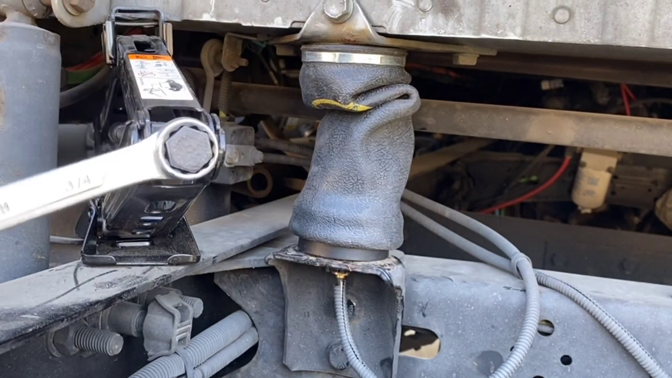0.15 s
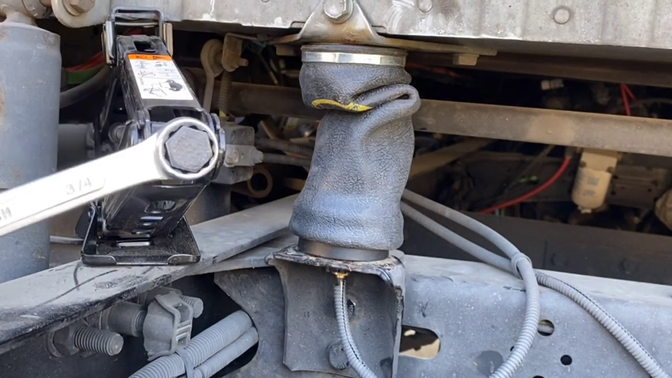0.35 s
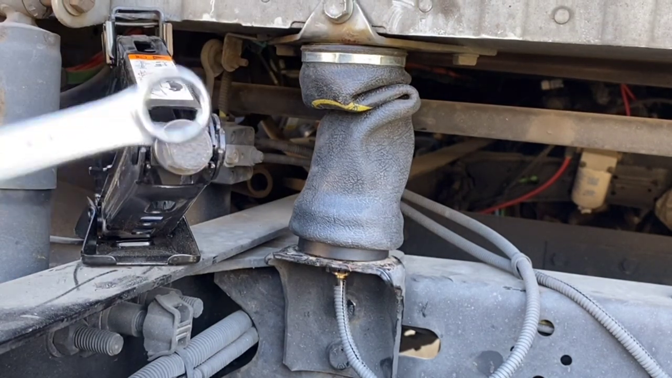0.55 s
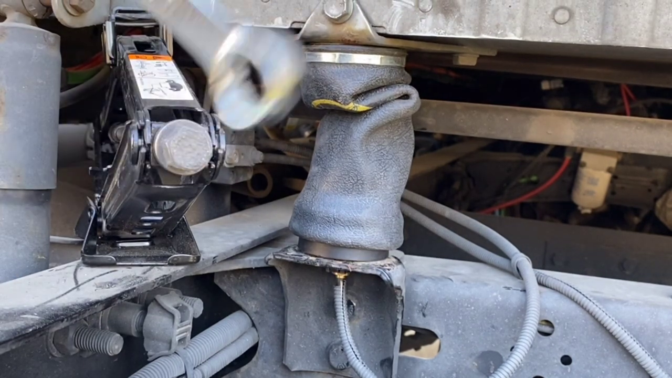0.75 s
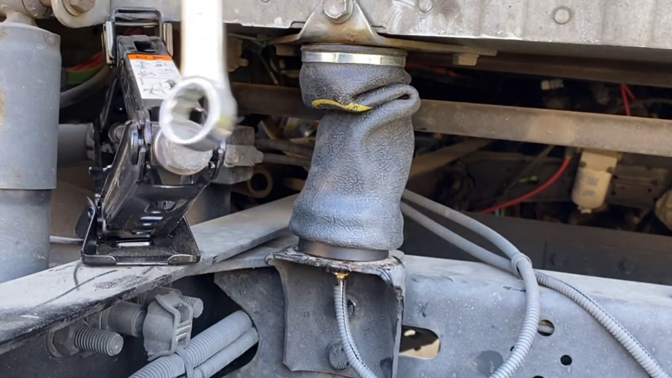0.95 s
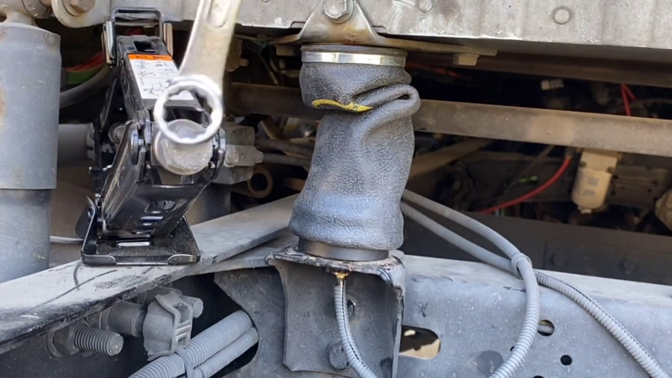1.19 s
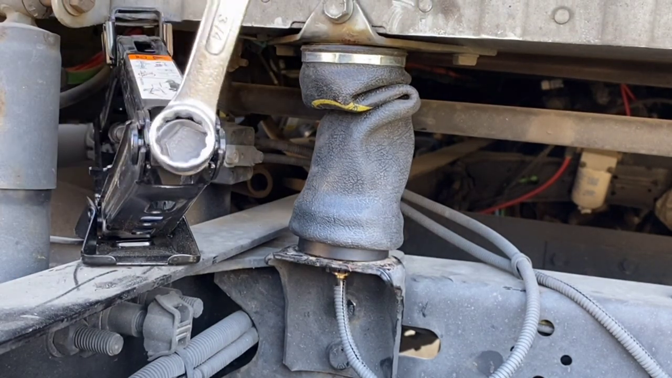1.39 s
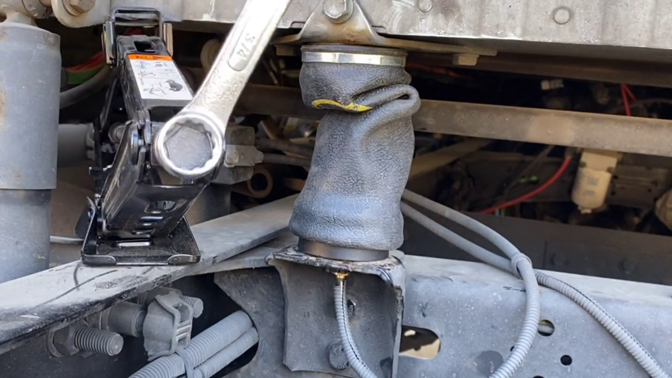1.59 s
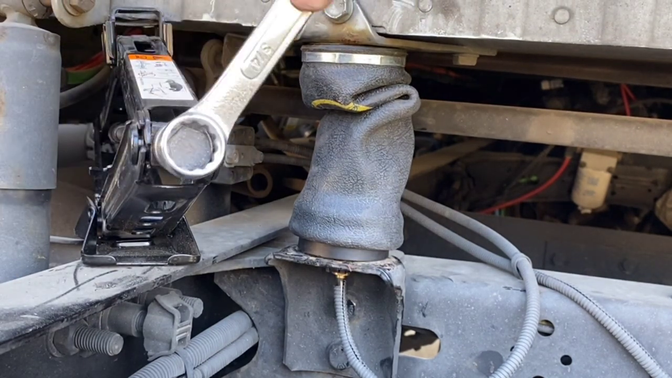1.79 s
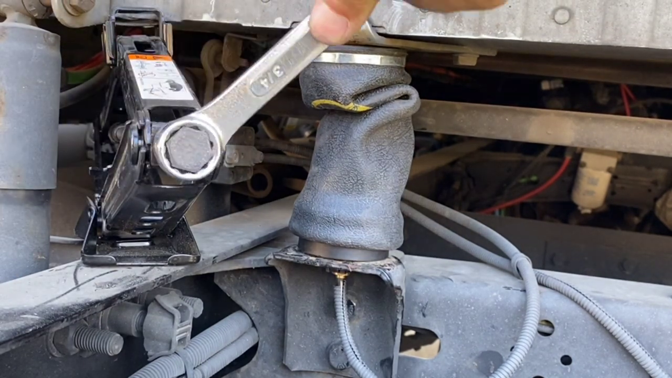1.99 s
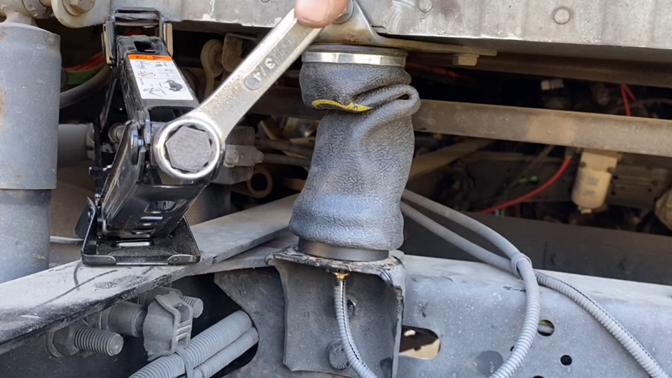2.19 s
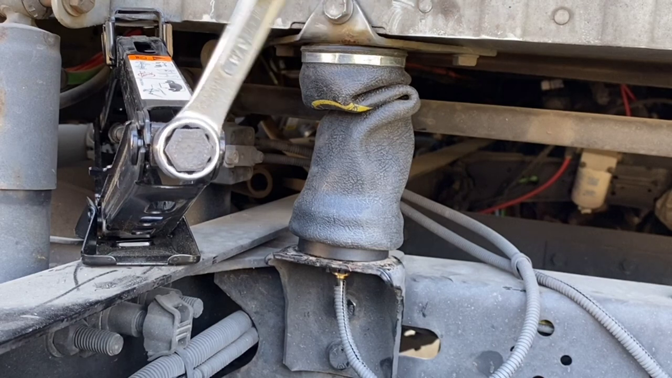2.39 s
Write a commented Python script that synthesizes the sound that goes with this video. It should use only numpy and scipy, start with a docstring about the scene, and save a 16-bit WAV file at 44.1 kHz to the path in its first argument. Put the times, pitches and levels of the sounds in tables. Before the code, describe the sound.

Steel wrench clanks on a jack's nut, pulled off and knocked back on, over low engine rumble

```python
"""A ring wrench works the screw of a scissor jack that stands on a truck's frame, outdoors.
The wrench is pulled off the nut, scrapes clear, is set on again and knocks home. Each contact is a short
chatter of tiny steel impacts that rings wrench, jack and frame: decaying noise plus decaying cosines.
Grainy noise makes faint rubs, and the frame hums on one low note after the heavy knocks.
Some way off an engine rumbles steadily, as throbbing noise over a weak hum; behind it lies a faint hiss."""
import sys
import numpy as np
from scipy import signal
from scipy.fft import rfft, irfft, next_fast_len
from scipy.io import wavfile
from scipy.ndimage import uniform_filter1d

SR = 44100
rng = np.random.default_rng(int(sys.argv[2]) if len(sys.argv) > 2 else 0)


def store_pcm(level_fs):
    """Save levels as 16-bit WAV."""
    pcm = np.round(np.clip(level_fs, -1, 1) * 32767).astype(np.int16)
    wavfile.write(sys.argv[1], SR, np.atleast_2d(pcm).T)


N = 108045
T = np.arange(N) / SR
SIZE = next_fast_len(N + SR)  # room for one second of ringing after the end
HZ = np.maximum(np.arange(SIZE // 2 + 1) * SR / SIZE, 1)


def from_db(db):
    """Turn decibels into a gain."""
    return 10 ** (np.asarray(db) / 20)


def rms_one(x):
    """Scale a sound to an average (rms) strength of 1."""
    return x / np.sqrt(np.mean(x ** 2) + 1e-20)


def hump(x, width):
    """Bell curve of height 1; width is its standard deviation."""
    return np.exp(-.5 * (x / width) ** 2)


def at_hz(points, hz):
    """Read every column of a table at a pitch, on a log-frequency axis."""
    table_hz, *columns = np.transpose(points)
    return [np.interp(np.log(hz), np.log(table_hz), column) for column in columns]


def causal_response(db):
    """Filter with these gains that acts as promptly as possible, never early (minimum phase)."""
    cepstrum = irfft(np.log(from_db(db)))
    half = len(cepstrum) // 2
    cepstrum[1:half] *= 2
    cepstrum[half + 1:] = 0
    return np.exp(rfft(cepstrum))


def stereo_noise(likeness):
    """White noise in two channels: likeness 1 is the same in both, 0 is unrelated."""
    mid, side = rng.standard_normal((2, N))
    c = np.clip(likeness, -1, 1)
    return (np.sqrt(1 + c) * mid + np.sqrt(1 - c) * side * [[1], [-1]]) / np.sqrt(2)


def coloured(x, spectrum):
    """Filter a sound by a table of pitches in Hz and gains in dB."""
    gain = from_db(at_hz(spectrum, HZ)[0])
    return irfft(rfft(x, SIZE) * gain, SIZE)[:, :N]


def decay(t60_s):
    """Exponential fade of unit energy that drops 60 dB in t60_s."""
    fall = np.exp(-np.log(1000) * T[:SR] / max(t60_s, 1e-3))
    return fall / np.linalg.norm(fall)


# the pitches at which the strength of each contact is given: [pitch_hz, ...]
STRENGTH_HZ = (420, 900, 2300, 4500, 11000)
# wrench meets nut; build-up and dying away are the times to change by a factor e
# [peak_s, build_up_s, dying_away_s, five relative strengths_db (one at each of STRENGTH_HZ),
#  favoured_resonance_hz, resonance_lift_db]
WRENCH_CONTACTS = [ (0.058, .010, 0.016, -3.5, -10.5, -5.5, -14, -4.5, 3180, 2.3),
                   (0.088, .001, 0.00067, -14, -7, 3, 4.5, 12, 2360, 3.2),
                   (0.2219, 0.00097, 0.0054, 22.5, 15, 22.5, 28.5, 13.5, 3040, 2.3),
                   (0.224, .0005, 0.00083, 27.5, 31.5, 26, 32, 23.5, 2450, 11),
                   (0.407, 0.0014, 0.011, 14.5, 13, 2.5, -4, -5, 7740, 5.1),
                   (.457, .010, .02, 24.5, 32, 27.5, 21.5, 19.5, 962, 8.6),
                   (.477, .012, .015, 29, 29, 27.5, 22.5, 20.5, 1503, 7.5),
                   (1.2307, .0005, 0.011, -2, 8, 16.5, 23, 23, 815, 18.3),
                   (1.290, .001, .008, -3, 3.5, 15, 19.5, 14, 820, 15.6),
                   (1.347, .002, 0.0038, 11, 3.5, 0.5, -7, -8, 3300, 3.7),
                   (1.47, .001, 0.011, 15, 16, 7.5, -7, -0.5, 700, 2.6),
                   (1.524, 0.0015, .012, 13, 16, 10.5, -1, 3, 950, 2),
                   (1.549, .008, 0.0057, 16, 23.5, 8.5, 7, 1.5, 950, 2),
                   (1.5657, 0.0011, 0.0016, 26, 25.5, 19.5, 14.5, 7, 930, 3.5),
                   (1.882, 0.0064, 0.0092, 24.5, 21, 19, 12.5, 4, 770, 8),
                   (1.944, 0.006, 0.011, 31.5, 35, 28, 20, 23, 560, 5),
                   (1.992, .008, 0.014, 26, 10, 16, 4.5, -13.5, 830, 3),
                   (2.083, .0004, 0.0024, 8, 14, 2, -1.5, 15, 1100, 5),
                   (2.114, 0.0011, 0.0032, 24.5, 20, 22, 32.5, 33, 8020, 6.8),
                   (2.124, 0.0049, 0.0026, 24.5, 26.5, 26.5, 29, 23.5, 4350, 5.8)]
CHATTER_PER_S, CHATTER_SPREAD_DB = 2000, 4  # average rate and size spread of the tiny impacts
PEAK_BLOW = 3.23  # weight of the impact at the peak; a typical tiny one weighs 1
SPOT_RIPPLE_DB, ACCENT_WIDTH_OCT = 3.5, 0.17


def contacts(size=8192):
    """Forces on the steel: the swelling and dying chatter of each contact, and the blow at its peak."""
    lead = size // 4  # samples kept free before each peak
    force = np.zeros((2, N + 2 * size))
    t = (np.arange(size) - lead) / SR
    hz = np.maximum(np.arange(size // 2 + 1) * SR / size, 1)
    for peak_s, rise_s, fall_s, *strength_db, accent_hz, accent_db in WRENCH_CONTACTS:
        happens = rng.random(size) < CHATTER_PER_S / SR
        sizes = from_db(CHATTER_SPREAD_DB * rng.standard_normal(size))
        impacts = happens * sizes * rng.choice([-1, 1], size)
        impacts[lead] = PEAK_BLOW
        time_constant = np.maximum(np.where(t < 0, rise_s, fall_s), 1e-4)
        chatter = rfft(impacts * np.exp(-np.abs(t) / time_constant))

        # level out the chatter's own broad colour, so that the table sets it
        own_db = 10 * np.log10(uniform_filter1d(np.abs(chatter) ** 2, size=45) + 1e-9)
        colour_db = np.interp(np.log(hz), np.log(STRENGTH_HZ), strength_db)
        colour_db += accent_db * hump(np.log2(hz / accent_hz), ACCENT_WIDTH_OCT)

        # every spot of contact lifts some narrow resonances and misses others, less so in the bass
        ripple = rms_one(uniform_filter1d(rng.standard_normal(len(hz)), size=35))
        ripple_db = SPOT_RIPPLE_DB * ripple * np.minimum(hz / 3000, 1)

        start = int(peak_s * SR)
        chatter_force = irfft(chatter * causal_response(colour_db + ripple_db - own_db))
        force[0, start:start + size] += chatter_force
        force[1, start + lead:start + lead + size] += irfft(causal_response(colour_db))
    return force[:, lead:lead + N]


# dense ring of the chassis; t60 is the time to fade by 60 dB
# [pitch_hz, early_t60_s, late_t60_s, late_part_db (relative to the early part), left_right_likeness (0 to 1)]
CHASSIS_RING = [(200, 0.1, .7, -2, 0.69), (500, 0.069, 0.56, -3, 0.18), (1000, 0.025, .33, -3.5, 0.22),
                (2000, .04, 0.22, 0, 0.55), (4080, 0.032, 0.15, -8.5, 1), (8000, 0.031, 0.19, -10, 1),
                (15000, .018, .12, -13.5, 0.84)]
CHASSIS_DB = 2.5


def chassis(count=18):
    """Countless close modes, as bands of fading noise: a quick clack and a longer ring."""
    out = 0
    edges = np.geomspace(120, 18000, count + 1)  # band edges in Hz
    for low, high in zip(edges, edges[1:]):
        early_s, late_s, late_db, likeness = at_hz(CHASSIS_RING, np.sqrt(low * high))
        fade = np.hypot(decay(early_s), from_db(late_db) * decay(late_s))
        ring = stereo_noise(likeness)[:, :SR] * fade
        band_pass = signal.butter(2, [low, high], "band", fs=SR, output="sos")
        band = signal.sosfilt(band_pass, ring)
        out = out + rms_one(band) * np.sqrt(2 * (high - low)) / SR
    return from_db(CHASSIS_DB) * out


# distinct notes of the jack: [pitch_hz, relative_height_db, t60_s]
JACK_NOTES = [(307.5, 10, .4), (417, 6.5, 0.41), (515.3, 4.5, 0.16), (554, 6.5, 0.29), (578.6, -7.5, 0.26),
              (744, 8, 0.42), (839.6, 7.5, .33), (972.3, 5, .3), (991.3, 10, 0.37), (1393, 1.5, .24),
              (1492, 12, .22), (1635, 14, 0.24), (1826, 9.5, 0.11)]
# distinct notes of the wrench, before the hand's damping: [pitch_hz, relative_height_db, undamped_t60_s]
WRENCH_NOTES = [(2260, 9.5, 0.2), (2746, 5.5, 0.2), (2773, 4.2, 0.4), (2973, 12, .16), (3527, 7, 0.17),
                (4383, 5.4, 0.12), (4930, 13, .17), (5155, 7, .1), (6228, 5.4, .35), (7540, 14, 0.039),
                (10830, 12, .05), (11430, 3.3, 0.14), (14700, 8.6, .04)]
MODES_DB = 1  # gain on all the notes
JACK_LONGEST_S, WRENCH_LONGEST_S = .6, .19  # upper limits on t60; the hand damps the wrench


def clear_modes():
    """Fading cosines: the distinct modes of jack and wrench after one impact."""
    out, t = np.zeros(SR), T[:SR]
    for modes, longest_s in ((JACK_NOTES, JACK_LONGEST_S), (WRENCH_NOTES, WRENCH_LONGEST_S)):
        for hz, db, t60_s in modes:
            rate = np.log(1000) / min(t60_s, longest_s)
            note = np.exp(-rate * t) * np.cos(2 * np.pi * hz * t)
            out += from_db(db) * 2 * rate / SR * note
    return from_db(MODES_DB) * out


# steel colour shared by all contacts: [pitch_hz, gain_db]
STEEL_COLOUR = [(130, -24), (220, -17.5), (364, -10.5), (569, -6), (634, -4.5), (975, -7.5), (1150, -9),
                (1790, -11), (2070, -12.5), (2220, -11.5), (3950, -13), (4480, -13), (5760, -22.5),
                (7670, -26.5), (9010, -29.5), (11200, -25), (16000, -42)]
BASS_CUT_HZ = 130


def wrench_on_jack():
    """The chatter rattles the chassis; the blows ring the clear modes."""
    high_pass = signal.butter(2, BASS_CUT_HZ, "high", fs=SR, output="sos")
    chatter, blows = rfft(signal.sosfilt(high_pass, contacts()), SIZE)
    ringing = chatter * rfft(chassis(), SIZE) + blows * rfft(clear_modes(), SIZE)
    steel = causal_response(at_hz(STEEL_COLOUR, HZ)[0])
    return irfft(ringing * steel, SIZE)[:, :N]


# soft rubbing as the hand shifts the wrench; half length is the standard deviation of a bell-shaped swell
# [middle_s, half_length_s, level_db (rms at the middle), centre_hz]
WRENCH_RUBS = [(.68, 0.075, -60.5, 3500), (0.666, 0.05, -52, 1600), (0.734, 0.087, -49, 457),
               (0.825, 0.027, -60, 11000), (0.969, 0.11, -67.5, 11000), (1.057, 0.073, -66.5, 2734),
               (1.384, 0.031, -58.5, 2980)]
RUB_WIDTH_OCT, RUB_GRAIN_DB = 0.23, 3.5


def rubs():
    """Faint friction: a band of noise with a random, grainy level, swelling and fading."""
    out = 0
    for middle_s, length_s, db, centre_hz in WRENCH_RUBS:
        band = hump(np.log2(HZ / centre_hz), RUB_WIDTH_OCT)
        noise = irfft(rfft(stereo_noise(0.99), SIZE) * band, SIZE)[:, :N]
        wander = rms_one(uniform_filter1d(rng.standard_normal(N), size=300))
        grain = from_db(RUB_GRAIN_DB * wander)
        out = out + from_db(db) * hump(T - middle_s, length_s) * rms_one(noise * grain)
    return out


# hums of the truck's frame after the heavy knocks
# [start_s, level_db (where the fade begins, before onset and left-right balance)]
FRAME_HUMS = [(0.492, -29), (1.949, -32.5)]
FRAME_HZ, FRAME_T60_S, FRAME_RISE_S = 148, 1.5, 0.005
BALANCE = from_db([[-0.5], [0.5]])  # left and right gains of frame and engine


def frame():
    """One low mode of the truck's frame: a sine that starts softly and is slow to die."""
    out = 0
    for start_s, db in FRAME_HUMS:
        t = np.maximum(T - start_s, 0)
        fade = from_db(db - 60 * t / FRAME_T60_S)
        onset = 1 - np.exp(-t / FRAME_RISE_S)
        out = out + fade * onset * np.sin(2 * np.pi * FRAME_HZ * t)
    return out * BALANCE


# colour of the engine's rumble: [pitch_hz, relative_level_db]
RUMBLE_COLOUR = [(15, -44), (25, -21), (36, -8.5), (52, 5.5), (75, 3), (110, -2), (160, -1), (200, -8),
                 (250, -18.5), (400, -19.5), (700, -34.5), (1200, -65.5)]
FIRING_HZ, THROB_DEPTH = 37.75, .35
RUMBLE_DB, RUMBLE_LIKENESS = -37.5, .87  # rms level before the balance; left-right likeness
HUM_HZ, HUM_DB = 59.2, -47  # rms level before the balance


def engine():
    """Low exhaust rumble, as noise that throbs with the firings, over a weak sine hum."""
    throb = 1 + THROB_DEPTH * np.sin(2 * np.pi * FIRING_HZ * T)
    rumble = rms_one(coloured(stereo_noise(RUMBLE_LIKENESS) * throb, RUMBLE_COLOUR))
    hum = np.sqrt(2) * np.sin(2 * np.pi * (HUM_HZ * T + rng.random()))
    return (from_db(RUMBLE_DB) * rumble + from_db(HUM_DB) * hum) * BALANCE


# colour of the background hiss, before its level table: [pitch_hz, density_db_per_hz]
BACKGROUND_COLOUR = [(200, -87.5), (400, -99), (800, -92), (1600, -95.5), (3200, -105), (7000, -116),
                     (16000, -125)]
# set course of the background hiss's level, heard as rises and dips: [time_s, gain_db]
BACKGROUND_LEVEL = [(0, -3), (.5, 15.5), (1.0, -0.5), (1.2, 2), (1.5, 4), (1.76, -6.5), (1.9, 2), (2.2, 10),
                    (2.45, 1)]
# steady hiss of the microphone: [pitch_hz, density_db_per_hz]
MICROPHONE_HISS = [(2000, -125), (5000, -116), (8000, -110), (11000, -107), (16000, -110)]


def background_hiss():
    """Two filtered noises: one whose level follows a set course, and the microphone's own steady hiss."""
    level = from_db(np.interp(T, *np.transpose(BACKGROUND_LEVEL)))
    background = coloured(stereo_noise(.8), BACKGROUND_COLOUR) * level
    microphone = coloured(stereo_noise(1.0), MICROPHONE_HISS)
    return (background + microphone) * np.sqrt(SR / 2)  # from level per Hz to full band


def scene():
    """Wrench, jack and frame close by, engine and hiss behind."""
    return wrench_on_jack() + frame() + rubs() + engine() + background_hiss()


# how far the right port's phase lags the left's: [pitch_hz, lag_rad]
PORT_LAG = [(0, 0), (650, .2), (830, 1.5), (1000, 0), (1200, 0), (1450, 1.7), (1700, .1), (2000, .2),
            (7000, -.1), (9100, -3.2), (11300, -6.3), (13300, -9.4), (16500, -13.8)]
CUTOFF_HZ = 16200


def record(dry):
    """The two ports hear with a phase difference; peaks clip and the top is cut."""
    lag = np.exp(-1j * np.interp(HZ, *np.transpose(PORT_LAG)))
    right = irfft(rfft(dry[1], SIZE) * lag, SIZE)[:N]
    clipped = np.clip(np.array([dry[0], right]), -1, 1)
    low_pass = signal.ellip(10, .2, 70, CUTOFF_HZ, fs=SR, output="sos")
    return signal.sosfilt(low_pass, clipped)


dry = scene()
out = record(dry)
store_pcm(out)
```